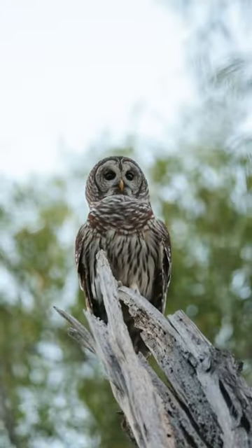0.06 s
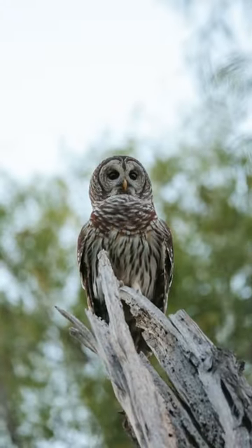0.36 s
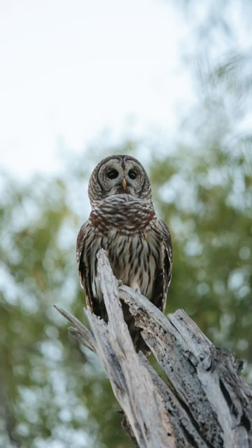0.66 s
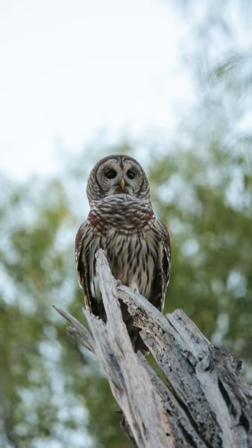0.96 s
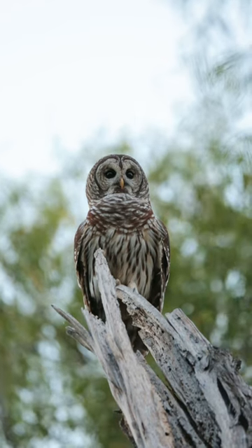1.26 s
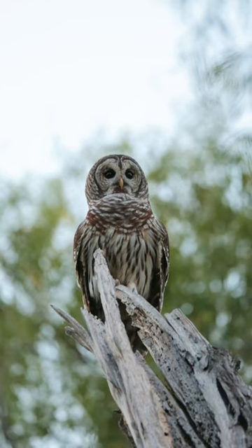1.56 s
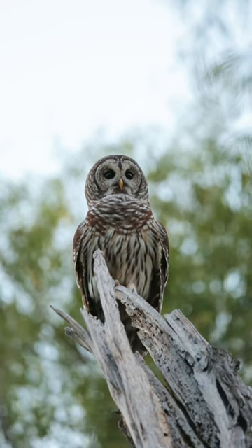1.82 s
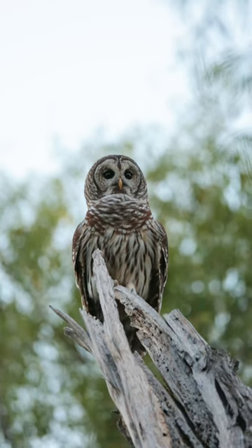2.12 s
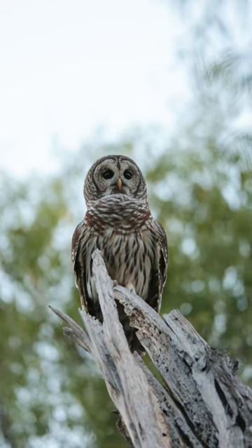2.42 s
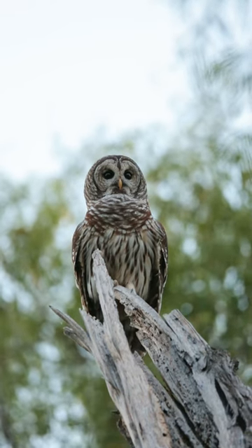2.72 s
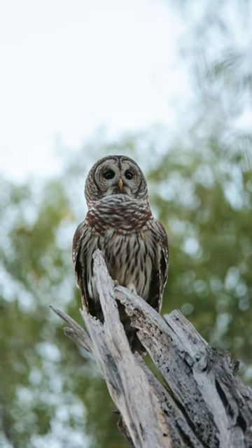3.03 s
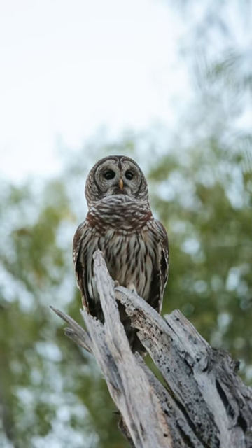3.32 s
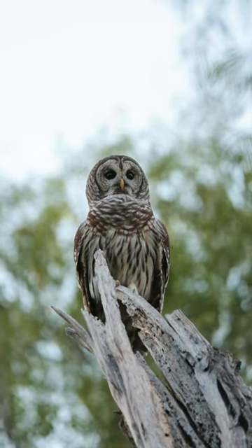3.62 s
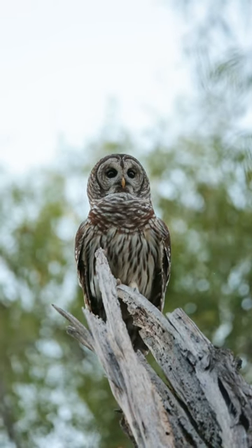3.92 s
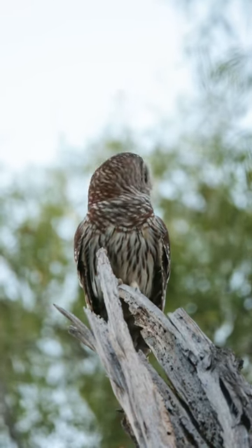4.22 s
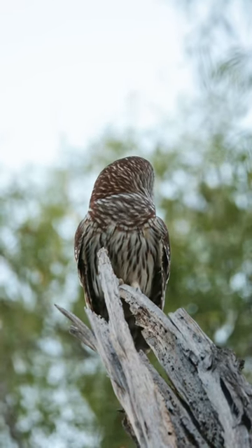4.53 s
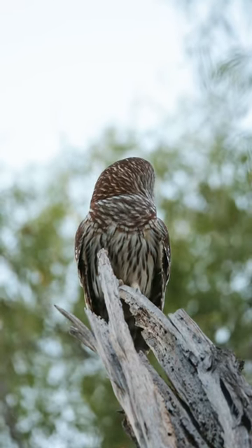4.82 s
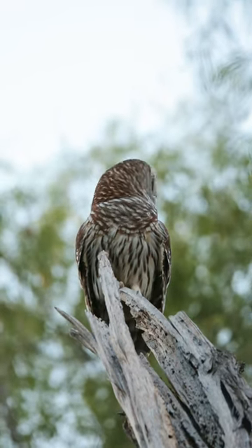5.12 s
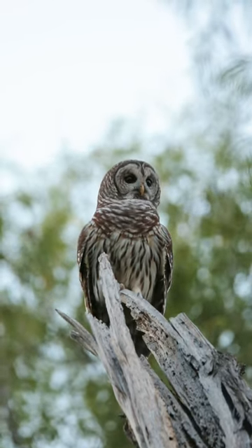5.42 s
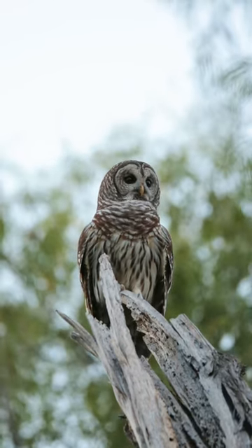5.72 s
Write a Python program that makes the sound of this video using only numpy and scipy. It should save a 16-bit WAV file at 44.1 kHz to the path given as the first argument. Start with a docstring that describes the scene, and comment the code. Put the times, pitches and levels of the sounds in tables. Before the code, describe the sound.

A nearby katydid ticks and rasps over the constant shrill hiss of distant insects, with faint frog-like croaking beneath.

```python
"""A katydid ticks close to the microphone, then rasps its wings, over the shrill hiss of far ones.
Evening at the edge of a wood, one microphone, mono. One conehead katydid's wing buzz runs down and
stops while a second one's swells; a far cricket trills briefly. Far below them in pitch lie a croaking
murmur, perhaps of frogs, and soft rumbling air. At the very end something taps the camera once."""
import sys
import numpy as np
from scipy import signal
from scipy.fft import rfft, irfft
from scipy.io import wavfile

SR = 44100
rng = np.random.default_rng(int(sys.argv[2]) if len(sys.argv) > 2 else 0)


def unload_audio(sound):
    """Save the sound as a 16-bit wav file, at the path given as the first command line argument."""
    columns = np.transpose(np.atleast_2d(sound))
    # keep every value between -1 and 1, then stretch to whole-number steps
    steps = np.round(np.clip(columns, -1, 1) * 32767)
    wavfile.write(sys.argv[1], SR, steps.astype(np.int16))


N = 263277
TIME = np.arange(N) / SR

# spectra of the still air, the blurred buzz of far insects and the low rumble: f/Hz, level/dB
AIR_SPECTRUM = [(20, -2.5), (45, -2), (60, -2.5), (110, -1), (170, -2), (300, -6), (500, -3), (800, -2.5),
                (1000, -9), (1600, -13), (2700, -19.5), (5000, -32.5), (16000, -46)]
FAR_BUZZ_SPECTRUM = [(2600, -26), (3300, -9), (3900, -3.5), (4600, -2), (5200, 0), (6200, -0.5),
                     (6800, -1.5), (7600, 2), (8300, -2), (10000, -7), (14000, -15.5)]
RUMBLE_SPECTRUM = [(40, -15), (80, -6.5), (120, 3), (180, 1.5), (260, -12.5), (500, -29)]
# rise and fall of the rumble: t/s, level/dB
RUMBLE_LEVEL = [(0, -52.5), (.5, -61.5), (2.2, -58), (3.2, -70), (3.8, -62.5), (4.75, -52.5), (5.1, -70)]
# far hums that come and go: f/Hz, top of the swell t/s, half length/s, level/dB
HUMS = [(81.5, 3.94, 1.5, -61.5), (257, 3.79, 0.18, -61)]

# distant croaking murmur: t/s, lower resonance level/dB, upper resonance level/dB
MURMUR_LEVELS = [(0.0, -57, -56), (0.6, -57.5, -58.5), (1.49, -47.5, -58.5), (1.55, -48, -55),
                 (1.7, -50.5, -58), (3.19, -49, -52), (3.32, -48.5, -56.5), (4.62, -53.5, -54),
                 (5.11, -52.5, -60.5), (5.88, -59.5, -60.5)]
# its lower and upper throat resonances: f/Hz, level/dB
LOWER_THROAT_SPECTRUM = [(250, -49), (400, -12.5), (480, -8), (600, -4), (690, 2), (780, -9), (900, -23),
                         (1300, -25)]
UPPER_THROAT_SPECTRUM = [(800, -17.5), (1080, 1), (1250, 0.5), (1450, -3.5), (1700, -10.5), (2100, -10),
                         (3200, -23)]
# nearer croaks that stand out: t/s, level/dB
CROAKS = [(.355, -51), (1.15, -47.5), (1.541, -41), (2.755, -46), (3.949, -44), (4.46, -42.5)]

# dull spectrum of the tap on the camera: f/Hz, level/dB
TAP_SPECTRUM = [(100, -15), (400, -3), (900, -2), (1500, -5), (2500, 0), (3300, -29), (6000, -50)]

# rise and fall of the far katydids: t/s, level/dB
CHORUS_LEVEL = [(0, -36), (.45, -34), (1, -34.5), (1.25, -34), (3.25, -35), (3.75, -38.5), (4.05, -37),
                (4.25, -36.5), (5.97, -36)]
# their hiss: f/Hz, level/dB
CHORUS_SPECTRUM = [(6000, -31), (8500, -19), (10000, -10.5), (11200, -7.5), (12500, -4), (13600, -3),
                   (14500, -9), (15800, -11.5)]

# wing beat of the two coneheads, the first running down, the second nearly steady: t/s, f/Hz
BEAT_FIRST = [(0, 170.36), (1, 170.18), (2, 169.9), (3, 168.85), (3.5, 168.2), (4, 167.3)]
BEAT_SECOND = [(2, 153.34), (3, 153.22), (4.3, 152.95)]
# their songs: t/s, level/dB, lift of odd overtones and dip of even ones/dB, ringing peak f/Hz
SONG_FIRST = [(0, -64.5, 13.5, 5980), (.88, -62.5, 12.5, 6030), (.98, -56, 3.5, 6060),
              (1.68, -55, 4.5, 5910), (2.1, -60.5, 1, 5620), (2.45, -68, -10.5, 5620),
              (3.1, -63.5, -4, 5620), (3.7, -61.5, 7.5, 5330), (3.95, -83, 2, 5280)]
SONG_SECOND = [(0.8, -71, -4, 6710.0), (1.7, -59.5, -4.5, 6140.0), (2.35, -60, -6.5, 6500),
               (3.1, -59, 2.5, 5820.0), (3.7, -56, -1.3, 5830), (4.6, -55.5, 0, 5730),
               (5.2, -57, 2, 5780.0), (5.9, -56, 2, 5830)]
# their strong overtones: multiple of the beat, relative level/dB
OVERTONES_FIRST = [(25, -5), (26, -8), (27, -6.5), (30, 0.3), (33, -13), (34, -11.5), (35, -16.5), (36, -6),
                   (37, -11), (38, 2.5), (41, -4), (42, -6), (44, -3), (46, -1)]
OVERTONES_SECOND = [(28, -8.5), (34, 1), (36, -2.5), (37, -0.5), (38, -3.5), (39, -2.5), (41, -0.5),
                    (42, -6), (43, -2.5), (45, -4), (47, -4.5), (48, -10), (49, 0.5), (50, -3)]

# wing resonances of the near katydid: f/Hz, width/Hz, relative level/dB
WING_MODES = [(10600, 1300, -11), (11210, 340, -3), (11900, 420, 0), (12430, 440, 0), (13680, 650, -5),
              (14550, 900, -9)]
# its single wing strokes: start t/s, level/dB
TICKS = [(.018, -26), (.097, -25.5), (.455, -35), (.533, -34), (.643, -34), (.797, -31), (.870, -28.5),
         (.938, -29), (1.028, -26.5), (1.121, -41), (3.330, -29), (3.414, -26.5), (3.495, -28.5),
         (3.631, -27), (3.776, -27), (4.272, -27.5), (4.410, -28), (4.565, -26), (5.258, -28.5),
         (5.349, -28), (5.555, -29), (5.647, -27)]


def amp(db):
    """Decibels to amplitude."""
    return 10 ** (np.asarray(db) / 20)


def unit(x):
    """Scales to rms 1."""
    return x / np.sqrt(np.mean(x ** 2) + 1e-20)


def curve(rows, column=1):
    """One column of a table, joined by straight lines in time."""
    rows = np.asarray(rows)
    return np.interp(TIME, rows[:, 0], rows[:, column])


def noise(spectrum):
    """Noise of rms 1 with the given spectrum."""
    hz, db = np.transpose(spectrum)
    bin_hz = np.fft.rfftfreq(2 * N, 1 / SR)
    gain = amp(np.interp(np.log(bin_hz + 1), np.log(hz), db))
    return unit(irfft(rfft(rng.standard_normal(N), 2 * N) * gain)[:N])


def drift(rate):
    """A random wander of rms 1 that turns about rate times a second."""
    knots = rng.standard_normal(8192)
    return unit(np.interp(TIME * rate, np.arange(len(knots)), knots))


def tone(hz, waver, waver_rate):
    """A sine of rms 1 whose pitch wanders by the fraction waver."""
    turns = np.cumsum(hz * (1 + waver * drift(waver_rate))) / SR
    return np.sqrt(2) * np.sin(2 * np.pi * turns)


def swell(top_s, half_s):
    """A round-shouldered bell in time."""
    return np.exp(-np.minimum(abs((TIME - top_s) / half_s) ** 2.6, 50))


def foliage(x, t60, wet_db):
    """Leaves and trunks scatter a short tail of echoes toward the microphone."""
    t = TIME[:SR // 2]
    tail = rng.standard_normal(len(t)) * amp(-60 * t / t60)
    return x + amp(wet_db) * signal.fftconvolve(x, tail / np.linalg.norm(tail))[:N]


def wood_ambience(air_db=-52, far_buzz_db=-45):
    """The bed of the place: still air, blurred far insects, a slow rumble and faint hums."""
    hums = sum(amp(db) * swell(top_s, half_s) * tone(hz, waver=.021, waver_rate=8)
               for hz, top_s, half_s, db in HUMS)
    rumble = amp(curve(RUMBLE_LEVEL)) * noise(RUMBLE_SPECTRUM)
    air = amp(air_db) * noise(AIR_SPECTRUM)
    insects = amp(far_buzz_db + .41 * drift(9.8)) * noise(FAR_BUZZ_SPECTRUM)
    return air + insects + rumble + hums


def frogs(calls_per_s=330, lower_trim_db=-.5, upper_trim_db=-1):
    """Overlapping far croaks ring two throat resonances; a few come from nearer."""
    calls = (rng.random(N) < calls_per_s / SR) * amp(1.5 * rng.standard_normal(N))
    call_power = signal.fftconvolve(calls ** 2, np.hanning(600), "same")
    lumps = unit(np.sqrt(abs(call_power)))
    lower = noise(LOWER_THROAT_SPECTRUM) * amp(curve(MURMUR_LEVELS) + lower_trim_db)
    upper = noise(UPPER_THROAT_SPECTRUM) * amp(curve(MURMUR_LEVELS, column=2) + upper_trim_db)
    voice = tone(hz=670, waver=.08, waver_rate=300)
    nearer = voice * sum(amp(db) * swell(top_s, half_s=.014) for top_s, db in CROAKS)
    return lumps * (lower + upper) + foliage(nearer, t60=.15, wet_db=-7)


def far_cricket(pulse_hz=24.1, level_db=-56.5, end_s=.92, fade_s=.3):
    """A distant trill: short pulses of one slightly unsteady note, soon dying away."""
    pulses = unit(np.sin(np.pi * pulse_hz * TIME) ** 8)
    fade = np.clip((end_s - TIME) / fade_s, 0, 1)
    return amp(level_db) * fade * pulses * tone(hz=4370, waver=.012, waver_rate=150)


def camera_tap(at_s=5.923, level_db=-33, decay_s=.0031):
    """A light, dull knock on the camera that dies at once."""
    t = TIME - at_s
    return amp(level_db) * noise(TAP_SPECTRUM) * (t > 0) * np.exp(-abs(t) / decay_s)


def far_katydids(flutter_db=.75, waver_db=1.08):
    """With distance, many rasps at different stroke rates merge into a fluttering hiss."""
    flutter = 0
    for stroke_hz in rng.uniform(30, 62, 8):
        turns = np.cumsum(stroke_hz * (1 + .0437 * drift(6.3))) / SR
        flutter += np.sin(2 * np.pi * (turns + rng.random()))
    hiss = noise(CHORUS_SPECTRUM)
    return hiss * amp(curve(CHORUS_LEVEL) + flutter_db * unit(flutter) + waver_db * drift(22.05))


def conehead(beat, song, overtones, throb_hz, throb_depth, peak_throb_depth,
             weak_db, peak_db, peak_width_hz, strong_fade_db, weak_fade_db):
    """A wing beat makes a comb of throbbing overtones that fade in and out through the leaves."""
    beat_hz = curve(beat)
    turns = np.cumsum(beat_hz * (1 + .00012 * drift(12))) / SR
    level_db, odd_db, peak_hz = curve(song), curve(song, column=2), curve(song, column=3)
    strong = {round(k): db for k, db in overtones}
    buzz = np.zeros(N)
    for k in range(23, 58):
        fade_db = strong_fade_db if k in strong else weak_fade_db
        overtone_db = strong.get(k, weak_db) + fade_db * drift(1.3)
        # overtones at the ringing peak are louder and throb less
        ringing = np.exp(-((k * beat_hz - peak_hz) / peak_width_hz) ** 2)
        gain = amp(level_db + overtone_db + peak_db * ringing + (odd_db if k % 2 else -odd_db))
        depth = throb_depth + (peak_throb_depth - throb_depth) * ringing
        phase, lag = rng.random(2)
        throb = 1 + depth * np.cos(2 * np.pi * (throb_hz * TIME + lag))
        buzz += np.sqrt(2) * gain * throb * np.sin(2 * np.pi * (k * turns + phase))
    return buzz * amp(.5 * drift(11))  # the whole buzz wavers


def wing_strokes(strokes, rise_s, length_s, tooth_hz, uneven_db):
    """Each stroke drags the scraper over a file of teeth; every tooth kicks the wing's resonances."""
    t = TIME[:int(3 * length_s * SR)]
    stroke_shape = np.minimum(t / rise_s, 1) * np.exp(-(t / length_s) ** 4)
    force = np.zeros(N)
    for start_s, db in strokes:
        span = force[round(start_s * SR):][:len(t)]
        span += amp(db + uneven_db * rng.standard_normal()) * stroke_shape[:len(span)]
    teeth_passed = np.floor(np.cumsum(tooth_hz * (1 + .2 * drift(700))) / SR)
    kicks = unit(np.diff(teeth_passed, prepend=0))
    scrape = unit(kicks + .8 * rng.standard_normal(N))
    wing = 0
    for hz, width_hz, db in WING_MODES:
        b, a = signal.iirpeak(hz, hz / width_hz, SR)
        ring = signal.lfilter(b, a, signal.unit_impulse(2048))
        wing += amp(db) * signal.lfilter(b, a, ring)  # filtered twice for steep sides
    return signal.fftconvolve(force * scrape, wing / np.linalg.norm(wing))[:N]


def near_katydid(rasp_from_s=1.2865, rasp_to_s=2.71, stroke_hz=47.45, swell_s=.21, release_s=.047,
                 held_db=-28, ends_dip_db=5):
    """Close to the microphone, single wing strokes tick; a fast run of them swells into one rasp."""
    ticks = wing_strokes(TICKS, rise_s=.002, length_s=.0125, tooth_hz=1300, uneven_db=.1)
    starts = np.arange(rasp_from_s, rasp_to_s, 1 / stroke_hz)
    effort = np.clip(np.minimum((starts - rasp_from_s) / swell_s, (rasp_to_s - starts) / release_s), 0, 1)
    run = zip(starts, held_db - ends_dip_db * (1 - effort))
    rasp = wing_strokes(run, rise_s=.0038, length_s=.009, tooth_hz=1100, uneven_db=.6)
    return foliage(ticks, t60=.16, wet_db=-7.5) + foliage(rasp, t60=.08, wet_db=-5)


def scene():
    """Near and far meet in one microphone at the wood's edge; both channels carry the same signal."""
    first = conehead(BEAT_FIRST, SONG_FIRST, OVERTONES_FIRST,
                     throb_hz=48.25, throb_depth=.62, peak_throb_depth=.28, weak_db=-10.5,
                     peak_db=18.5, peak_width_hz=347, strong_fade_db=.2, weak_fade_db=2.5)
    second = conehead(BEAT_SECOND, SONG_SECOND, OVERTONES_SECOND,
                      throb_hz=44.7, throb_depth=.44, peak_throb_depth=.4, weak_db=-14,
                      peak_db=7.5, peak_width_hz=170, strong_fade_db=.8, weak_fade_db=.5)
    insects = near_katydid() + far_katydids() + first + second + far_cricket()
    mono = insects + frogs() + wood_ambience() + camera_tap()
    return np.array([mono, mono])


def record(dry):
    """The recorder's band limit cuts the highest treble steeply."""
    lowpass = signal.firwin(1023, cutoff=15740, window=("kaiser", 9), fs=SR)
    return signal.oaconvolve(dry, lowpass[None], "same", axes=1)


dry = scene()
out = record(dry)
unload_audio(out)
```